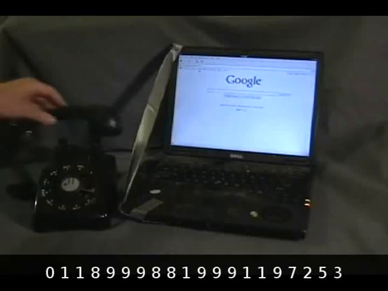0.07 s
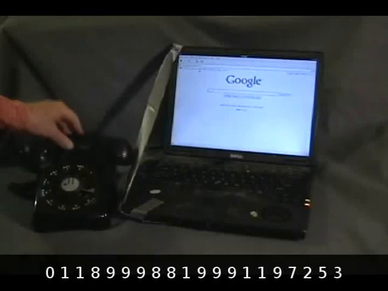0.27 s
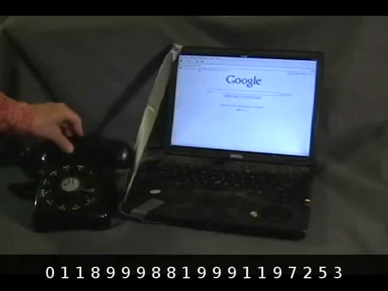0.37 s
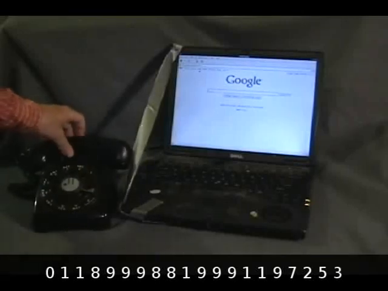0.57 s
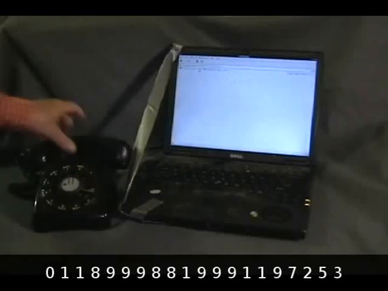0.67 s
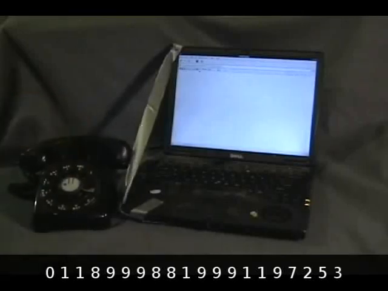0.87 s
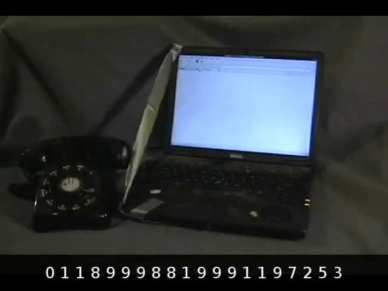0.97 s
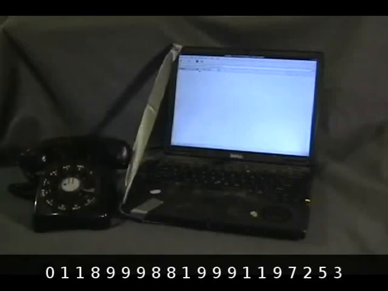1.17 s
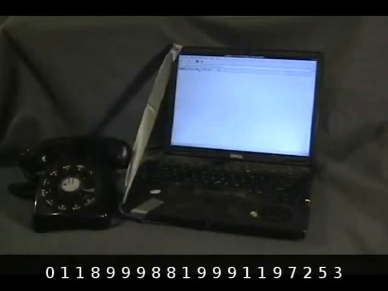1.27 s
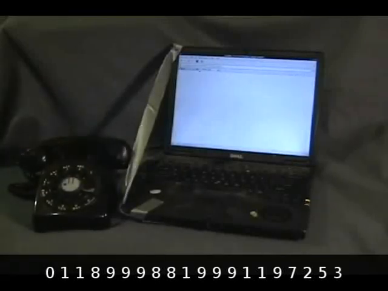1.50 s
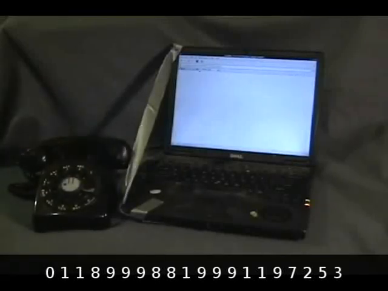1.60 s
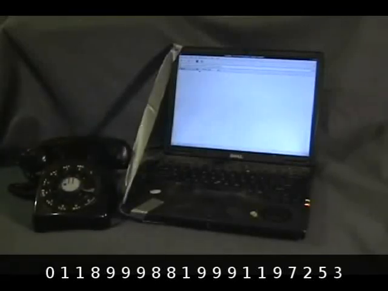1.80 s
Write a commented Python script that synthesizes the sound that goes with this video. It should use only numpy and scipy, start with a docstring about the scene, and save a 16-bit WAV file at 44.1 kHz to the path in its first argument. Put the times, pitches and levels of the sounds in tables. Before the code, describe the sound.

A heavy plastic telephone handset is hung up on a desk phone, heard close in a small, quiet room. A light graze at 0.14 seconds, then a loud, hollow clatter from 0.21, its knocks rocking and fading until about 0.42. Around 0.57 to 0.67, faint ticks and a grainy finger scuff as the hand lets go. Soft room noise and a faint wavering hum continue to about 1.9.

```python
"""Soft room noise and a faint wavering hum run throughout, in a small, quiet room.
A plastic handset dropped onto a desk telephone grazes the cradle, lands, and rocks end to end until it settles.
Each knock is a noise crack with chatter, plus dying sines for shell, prongs, hollow housing and desk.
Last, it ticks again as the hand lets go, with a short grainy noise scuff of the fingers."""
import sys
import numpy as np
from scipy import signal
from scipy.fft import rfft, irfft
from scipy.io import wavfile

SR = 44100
rng = np.random.default_rng(int(sys.argv[2]) if len(sys.argv) > 2 else 0)


def output_pcm(signal):
    """Save a mono or channel-first signal as 16-bit PCM at the path in sys.argv[1].

    Samples are clipped to [-1, 1] before scaling.
    """
    pcm = np.clip(np.atleast_2d(signal).T, -1, 1) * 32767
    wavfile.write(sys.argv[1], SR, np.round(pcm).astype(np.int16))


N = 81585


def amp(db):
    """Decibels to gain."""
    return 10 ** (np.asarray(db) / 20)


def unit(x):
    """Scales to rms 1."""
    return x / np.sqrt(np.mean(x ** 2) + 1e-20)


def read(points, hz):
    """Interpolates a table on a log-frequency axis."""
    f, value = np.transpose(points)
    return np.interp(np.log(hz + 1), np.log(f + 1), value)


def add(mix, start_s, sound):
    """Mixes a sound in at a time, cut at the end of the mix."""
    part = mix[max(round(start_s * SR), 0):][:len(sound)]
    part += sound[:len(part)]


def bins(x):
    """Frequencies of a signal's spectrum, Hz."""
    return np.fft.rfftfreq(x.shape[-1], 1 / SR)


def colour(x, points):
    """Zero-phase filter by a table of [f/Hz, gain/dB]."""
    return irfft(rfft(x) * amp(read(points, bins(x))), x.shape[-1])


def spread(pair, width):
    """Left and right from a middle signal plus and minus a scaled side signal."""
    middle, side = pair
    return np.array([middle + width * side, middle - width * side])


def air():
    """Steady coloured noise, slightly louder on the left, and a central hum gliding in pitch and level."""
    # room noise spectrum, shape only [f/Hz, density/dB per Hz]
    noise_colour = [(20, -23), (66, -14), (107, -6), (134, -9.5), (178, -3), (254, -6.5), (300, -10.5),
                    (760, -13), (1360, -22.5), (2400, -25), (5000, -34), (6200, -37.5), (7200, -53),
                    (9300, -34.5), (11000, -56)]
    # hum track [t/s, f/Hz, level/dB]
    hum_track = [(0, 167.8, -69), (.7, 194.4, -67), (.87, 188, -58), (1.001, 189.3, -53.5),
                 (1.07, 181.1, -70.5), (1.2, 163.2, -74), (1.33, 199.5, -63), (1.431, 245, -59),
                 (1.85, 259.9, -57.5)]
    noise_db, noise_width, waver_hz = -54, 0.57, 23

    pair = spread(rng.standard_normal((2, N)), noise_width)
    noise = amp(noise_db) * unit(colour(pair, noise_colour))

    t = np.arange(N) / SR
    track_s, track_hz, track_db = np.transpose(hum_track)
    # slow random amplitude waver: noise under a Gaussian low-pass
    lowpass = np.exp(-(bins(t) / waver_hz) ** 2)
    waver = unit(irfft(rfft(rng.standard_normal(N)) * lowpass, N))
    cycles = np.cumsum(np.interp(t, track_s, track_hz)) / SR
    tone = unit((1 + 0.4 * waver) * np.sin(2 * np.pi * cycles))
    hum = amp(np.interp(t, track_s, track_db)) * tone
    return noise * amp([[0.4], [-0.4]]) + hum


def ring(modes, t, tilt_db=0):
    """Sum of exponentially dying sines at random phases; tilt in dB per octave about a pivot pitch."""
    pivot_hz = 430
    total = 0
    for hz, db, t60_s in modes:
        level_db = db + tilt_db * np.log2(hz / pivot_hz) - 60 * t / t60_s
        total = total + amp(level_db) * np.sin(2 * np.pi * (hz * t + rng.random()))
    return total


def crack_and_chatter(t):
    """Random-sign noise: a brief hold and fast decay, then loose parts chattering as random ticks."""
    # colour of the contact crack [f/Hz, gain/dB]
    crack_colour = [(60, -25), (250, -14), (450, 1.5), (650, -2), (1050, 1.5), (1300, -1), (1750, -3),
                    (3100, -4), (5000, -13), (8500, -14), (11000, -22)]
    crack_db, crack_hold_s, crack_t60_s = -10.5, 0.0016, 0.024
    chatter_db, chatter_t60_s, chatter_per_s = -17.5, 0.13, 450  # chatter_db re crack
    tick_decay_s = 0.00085  # time constant, doubled by the square root below

    hiss = unit(colour(rng.choice([-1., 1.], len(t)), crack_colour))
    impulses = rng.random(len(t)) < chatter_per_s / SR
    ticks = signal.lfilter([1], [1, -np.exp(-1 / (tick_decay_s * SR))], impulses)
    chatter = unit(np.sqrt(ticks)) * amp(chatter_db - 60 * t / chatter_t60_s)
    crack = amp(-60 * np.maximum(t - crack_hold_s, 0) / crack_t60_s)
    return amp(crack_db) * hiss * (crack + chatter)


def knock(level_db, thump_db, hollow_db, tilt_db, prong_db, clack_db, snap_db, treble_db):
    """One contact excites shell, prongs, housing and desk; the contact point shifts the band weights."""
    # modes of hard plastic shell, cradle prongs, hollow housing, desk [f/Hz, level/dB, t60/s]
    shell_modes = [(721.3, -29, 0.11), (795, -18, 0.056), (1016, -19, 0.093), (1082, -14.5, 0.03),
                   (1150.4, -29, 0.06), (1366, -26.5, 0.09), (1677, -23.5, 0.045), (1936, -22, 0.036),
                   (2254, -31.5, 0.045), (2500, -22.5, 0.035), (2740, -18.5, 0.025), (2944, -28.5, 0.06),
                   (3196, -21.5, 0.039), (3387, -23, 0.023), (3990, -26.5, 0.03)]
    prong_modes = [(1563, -12, 0.028), (2353, -29.5, 0.07), (3214, -25.5, 0.041), (3700, -28, 0.025)]
    hollow_modes = [(351.7, -24, 0.22), (380, -26.5, 0.2), (412, -24.5, 0.13), (446.2, -23.5, 0.33),
                    (480.5, -19, 0.092), (526, -24, 0.1)]
    desk_modes = [(48, -45.5, 0.06), (112, -39.5, 0.22), (240.8, -33, 0.16), (272, -32, 0.14)]
    clack_hz, neutral_hz, snap_hz, treble_hz = 795.5, 1600, 2934, 7000
    attack_s = 0.00085

    t = np.arange(SR // 2) / SR
    hard = crack_and_chatter(t) + ring(shell_modes, t) + amp(prong_db) * ring(prong_modes, t)
    contact = [(clack_hz, clack_db), (neutral_hz, 0), (snap_hz, snap_db), (treble_hz, treble_db)]
    # padded so the filter does not wrap round
    hard = colour(np.pad(hard, (0, len(t))), contact)[:len(t)]
    housing = amp(hollow_db) * ring(hollow_modes, t, tilt_db)
    desk = amp(thump_db) * ring(desk_modes, t)
    onset = 1 - np.exp(-t / attack_s)
    return amp(level_db) * onset * (hard + housing + desk)


def room(x):
    """Near reflections as delayed copies, then a diffuse noise tail, decaying by band, widest near 1 kHz."""
    # nearby surfaces [delay/s, level/dB]
    echoes = [(.0052, -20.5), (.0083, -17), (0.0128, -15.5), (0.018, -17)]
    # tail decay [f/Hz, t60/s]
    tail_t60 = [(100, .5), (400, 0.4154), (1000, 0.3643), (3000, 0.1843), (6000, 0.42), (7500, 0.12),
                (11000, 0.01)]
    # tail colour [f/Hz, gain/dB]
    tail_colour = [(100, -14.5), (400, -13), (1000, -14), (3000, -5), (9000, -15)]
    # tail side against middle, before the width factor [f/Hz, gain/dB]
    tail_side = [(100, -12.5), (350, -5.5), (1000, -2.5), (2500, -9), (8000, -20)]
    build_s, width = 0.016, 0.75

    near = x.copy()
    for delay_s, db in echoes:
        add(near, delay_s, amp(db) * x)

    hz, t, spectrum = signal.stft(rng.standard_normal((2, SR)), SR, nperseg=256)
    decay = amp(-60 * t / read(tail_t60, hz)[:, None])
    tail = signal.istft(spectrum * decay, SR, nperseg=256)[1]
    middle, side = colour(tail / np.linalg.norm(tail[0]), tail_colour)
    tail = spread([middle, colour(side, tail_side)], width)[:, :SR // 2]
    build = 1 - np.exp(-(np.arange(SR // 2) / SR / build_s) ** 2)
    return near + signal.fftconvolve(x[None], tail * build, axes=1)[:, :N]


def scuff():
    """Fingers scuff off the handset: coarse-grained noise that swells quickly and trails off."""
    # scuff colour [f/Hz, gain/dB]
    scuff_colour = [(150, -7), (400, 8), (700, -6), (1200, -8), (1750, 6), (2600, -10), (4000, -2.5),
                    (6500, -15.5), (10000, -50)]
    length_s, level_db, grain_db = 0.13, -50.5, 3

    u = np.arange(0, 1, 1 / (length_s * SR))
    grains = rng.standard_normal(SR) * amp(grain_db * rng.exponential(1, SR))
    swell = np.sin(np.pi * u ** 0.5)
    return amp(level_db) * swell * unit(colour(grains, scuff_colour))[:len(u)]


def handset():
    """All knocks and the scuff in the room, with left-right level and phase differences by frequency."""
    # contacts of handset on cradle [t/s, level/dB, desk thump/dB, hollow ring/dB,
    # hollow tilt/dB per octave, prong ring/dB, clack/dB, snap/dB, treble/dB]
    knocks = [(0.1395, -19, -3.5, 4.5, 8, 3, -14.5, -7.5, -5.5),
              (0.2099, -1, -11, -1, 4.5, -9.5, -1, -5, 0.5),
              (0.2165, -9.5, -1.5, -1, 1, -12.5, -6.5, -1.5, 11),
              (0.2361, 2.5, 4, 0.5, -2, -5.5, 2.5, -0.5, 2), (0.2418, -1, -2.5, 0, -1, -8.5, 2, 0, 3),
              (0.2546, -0.5, 1, 1, 1.5, -7.5, -0.5, -1.5, -2),
              (0.2608, -13, -5, -3.5, 0.5, -9, -1.5, 5, 8.5),
              (0.2702, -14, -7.5, -4, -0.5, -10, -6.5, 1, 13),
              (0.2795, -21.5, -5.5, -5, -0.5, -10.5, -2.5, 5, 12),
              (0.2945, -17, -6.5, 4.5, 7, -11, -0.5, -5, -5),
              (0.303, -5.5, -10, 4, -0.5, -9, 1.5, 1.5, -7.5),
              (0.3075, -10.5, -4.5, -3.5, 0, -6, -2, -7.5, -10),
              (0.3338, -5.5, -7, 3.5, -3, -1, -0.5, 3, 0), (0.346, -18, -5, 5.5, -3.5, -12, -7, -9, -6),
              (0.3607, -16.5, -7, 0, -0.5, 1, -8, -3, 1), (0.3635, -12, -6, 3, -1.5, -7, 0, -2, 3.5),
              (0.379, -17.5, -13, 7.5, -1, -3, 0, 2.5, -3), (0.388, -19.5, -3.5, -1.5, 0, -3, 0, -5, -19),
              (0.402, -23, 15, 2, -11, -2, -3, -11, -16), (0.424, -32.5, 21.5, 2.5, 1, -8, -2, -15, -13),
              (0.57, -35.5, -10, -3, 5, 3, 2, 7, -0.5), (0.582, -37, -5, 9, -12, -8, -15, -6, -9),
              (0.5939, -35.5, -11, -11, 5, 6, -2, 3.5, -6), (0.598, -39, -11, -11, 1, 7, -11, -10, -9.5),
              (0.619, -37.5, -8, 2, -8, -5, 7, -5, -10), (0.642, -39.5, 1, -4, -3, -9, 1, -6, -3),
              (0.665, -44, -2, 1, -3, -6, 9, -10, -8)]
    # left minus right [f/Hz, level/dB]
    balance = [(60, -0.5), (250, -1.1), (450, -0.5), (700, 2), (1400, 3), (3000, 1), (6000, 0.57),
               (10000, 1.3)]
    # phase by which left leads [f/Hz, phase/rad]
    lead = [(0, 0.035), (600, 0.31), (1460, 0.089), (1810, 0.28), (2150, 0.064), (11500, -0.0)]

    dry = np.zeros(N)
    for start_s, *blow in knocks:
        add(dry, start_s, knock(*blow))
    add(dry, 0.572, scuff())

    hz = bins(dry)
    half = np.array([[0.5], [-0.5]])  # half the difference to each side
    gain = amp(half * read(balance, hz))
    phase = np.exp(1j * half * read(lead, hz))
    return irfft(rfft(room(dry)) * gain * phase, N)


def scene():
    """The handset over the room noise and hum."""
    return handset() + air()


def record(dry):
    """The recorder's low cut, soft tanh overload and linear-phase band limit."""
    low_cut_hz, ceiling, edge_hz = 35, 0.4, 10650
    low_cut = signal.butter(2, low_cut_hz, "high", fs=SR, output="sos")
    thin = signal.sosfilt(low_cut, dry)
    rounded = ceiling * np.tanh(thin / ceiling)
    band_limit = signal.firwin(511, edge_hz, window=("kaiser", 9), fs=SR)
    return signal.oaconvolve(rounded, band_limit[None], "same")


dry = scene()
out = record(dry)
output_pcm(out)
```